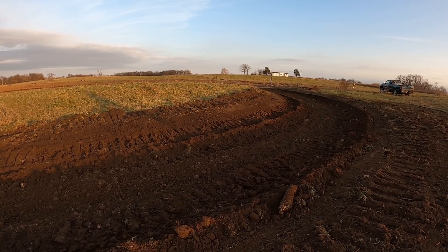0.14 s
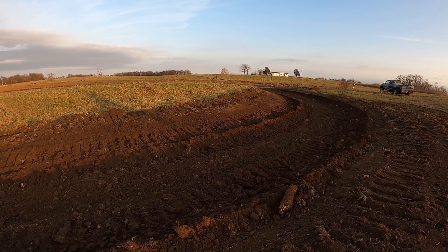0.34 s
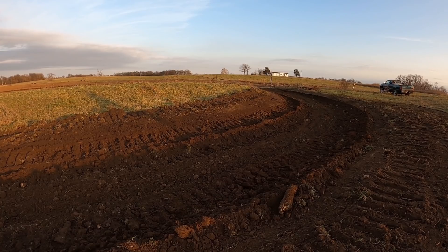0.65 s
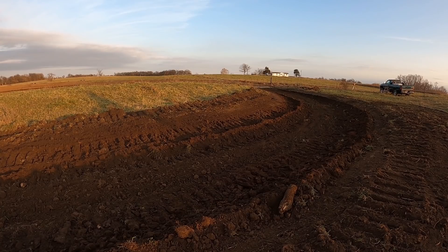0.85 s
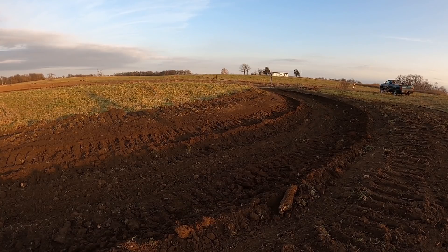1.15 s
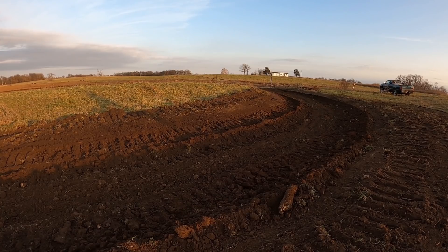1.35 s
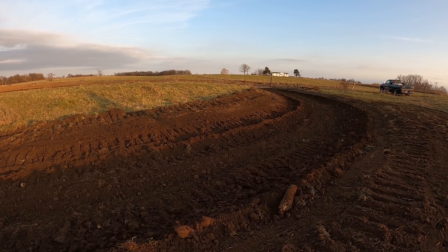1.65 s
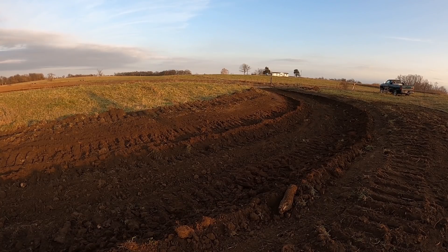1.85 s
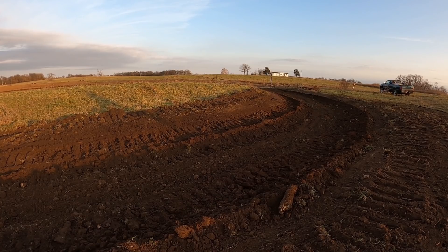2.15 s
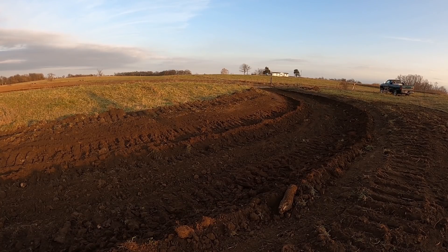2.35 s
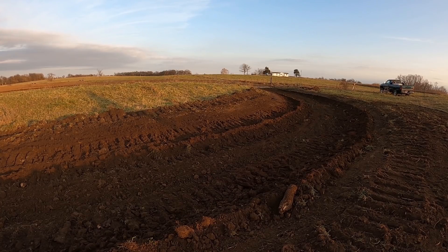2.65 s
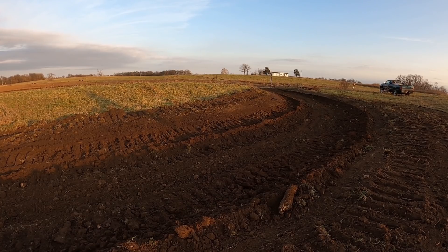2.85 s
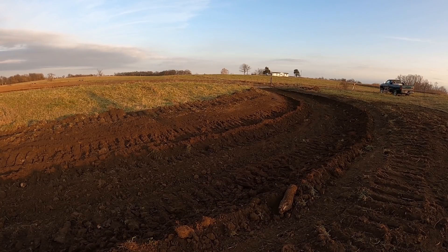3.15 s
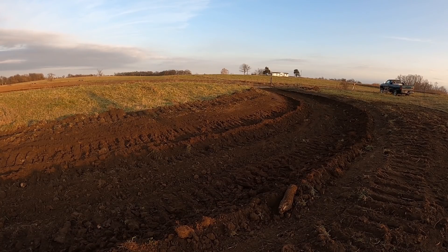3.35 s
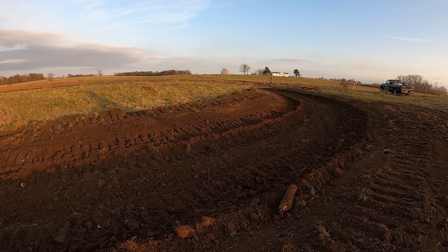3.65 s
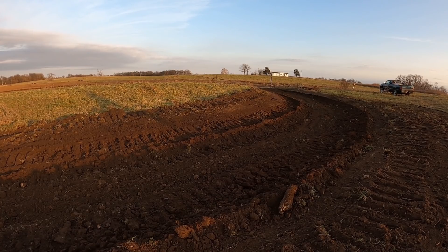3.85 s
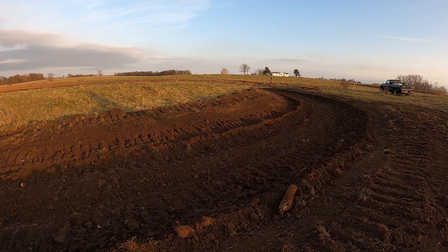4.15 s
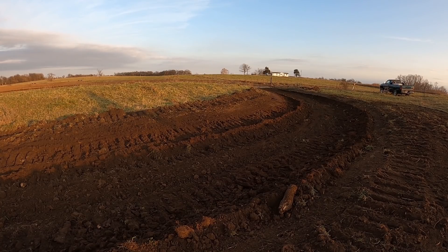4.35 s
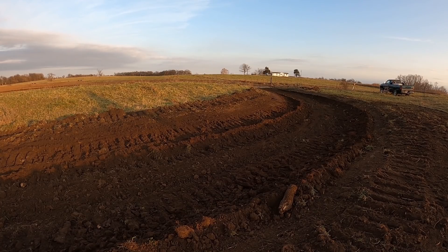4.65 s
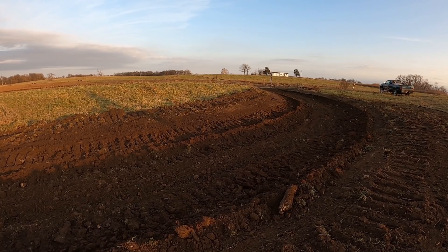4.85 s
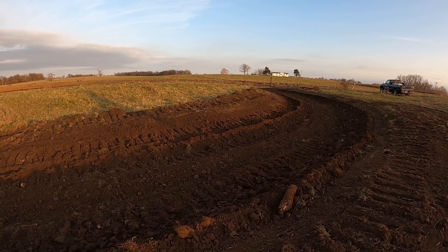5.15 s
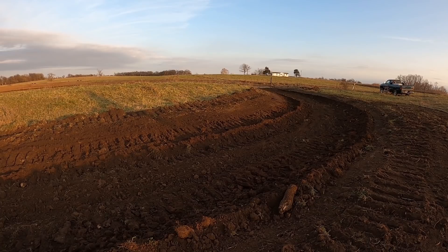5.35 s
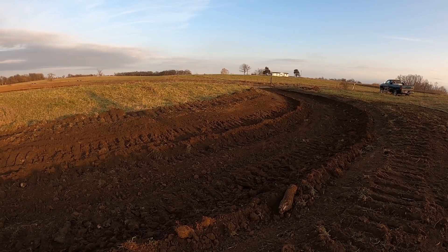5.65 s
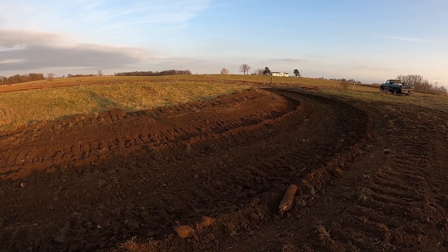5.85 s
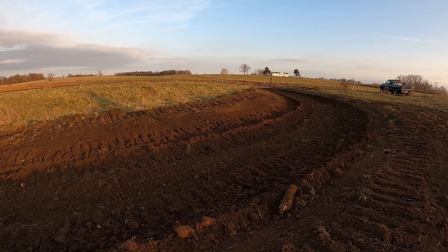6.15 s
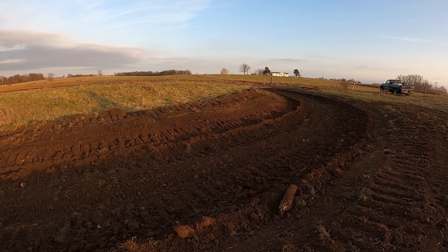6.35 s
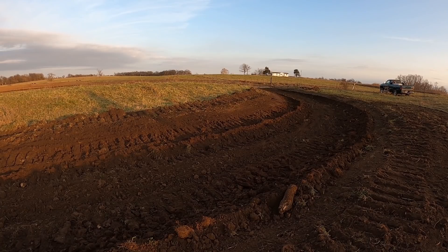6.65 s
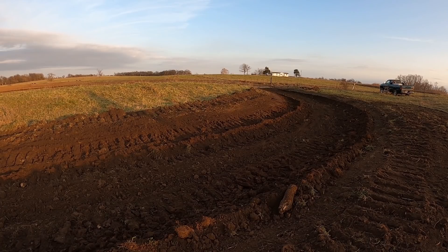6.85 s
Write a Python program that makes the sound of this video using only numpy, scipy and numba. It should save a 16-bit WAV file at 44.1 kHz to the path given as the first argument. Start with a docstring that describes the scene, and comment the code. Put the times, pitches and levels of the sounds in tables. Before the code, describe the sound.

A diesel crawler works in an open field, unseen, off to the left. From 0 to 2.2 seconds its engine holds a low, buzzing drone around 110 Hz, with frame rumble, fan roar, light hiss, thin intake whistle and a rough, patchy gear whine near 1 kHz. Track links clank in quick irregular clusters, with fine metallic ticks; tiny high squeaks come at the start and near 1 second. At about 2.3 the throttle drops: the note weakens and slides down by more than an octave until 3.3, whine fading, clanks continuing more sparsely. Around 3.4 the engine catches strongly and climbs back by 4.1, almost clank-free. Then clanks return, steadier and brighter, roar builds, and the whine rises slightly higher than before, with a brief squeak near 6.2. Work continues to the cut at 7 seconds. Treble is muffled; the right side is thinner and more diffuse.

```python
"""A diesel crawler works soil off to the left of a small camera in an open field.
Its engine sags when the throttle drops, then pulls back up: tones follow the cylinder firings,
and random pulses ring the exhaust pipe. Track links clank as rattles of blows into plate resonances.
Filtered noise makes the fan roar, hiss and intake whistle; sine waves make the gear whine and pin squeaks.
The right side hears the machine thinned by subtracting two microphone ports, plus diffuse sound."""
import sys
import numpy as np
from scipy import signal
from scipy.fft import rfft, irfft, next_fast_len
from scipy.io import wavfile
from scipy.ndimage import uniform_filter1d
from numba import njit

SR = 44100
rng = np.random.default_rng(int(sys.argv[2]) if len(sys.argv) > 2 else 0)


def unload_audio(sound):
    """Save the sound as a 16-bit wav file, at the path given as the first command line argument."""
    columns = np.transpose(np.atleast_2d(sound))
    # keep every value between -1 and 1, then stretch to whole-number steps
    steps = np.round(np.clip(columns, -1, 1) * 32767)
    wavfile.write(sys.argv[1], SR, steps.astype(np.int16))


N = 309141  # samples

# Engine at work, throttle cut, coast down, pull back up: time_s, firing_rate_hz, note_level_db
ENGINE = [(0, 111.1, -15), (1.02, 112.3, -18), (1.12, 109.5, -16), (1.35, 111.7, -16.5), (2.245, 109, -18),
          (2.285, 106.4, -27.5), (2.34, 100, -30), (2.5, 87.8, -30), (2.7, 76.2, -24.5), (2.9, 66.3, -30),
          (3.26, 45.7, -31), (3.32, 46.02, -27.5), (3.39, 58.66, -19.5), (3.45, 65.3, -15.5),
          (3.74, 82.44, -16), (4.09, 99.05, -15.5), (4.3, 98.63, -18), (4.45, 97.4, -18),
          (5.02, 105.2, -17.5), (6.2, 107.9, -17), (7.01, 109.1, -17.5)]
# Engine octave set by the pipe: octave_pitch_hz, level_against_note_db
OCTAVE = [(90, 9), (112, -2), (132, -14), (146, -15.5), (156, -24), (165, -2), (176, -14), (186, -22),
          (200, -24), (216, -20.5), (223, -13.5)]
# Tones from uneven cylinder banks: multiple_of_firing_rate, level_against_note_db (peak against rms)
HALF_ORDERS = [(.5, -29), (1.5, -15)]
# Exhaust pipe resonances: pitch_hz, width_hz (each of two passes), relative_level_db
PIPE = [(225.1, 13, 0), (242.2, 9.7, 2), (288, 40, -8.5)]
# Noise under load: time_s, relative_roar_level_db, relative_rumble_level_db
LOAD = [(0, -31.5, -30.5), (.95, -34, -28.5), (1.31, -35, -31), (1.62, -32.5, -27.5), (2.07, -34.5, -27.5),
        (2.7, -37.5, -28), (3.35, -41, -31.5), (3.42, -41, -27.5), (3.62, -41.5, -30), (3.85, -39.5, -29),
        (4.2, -35.5, -27.5), (5.11, -33, -25.5), (7.01, -30.5, -25.5)]
# Tone colour of the frame rumble: pitch_hz, relative_level_db (per Hz)
RUMBLE = [(20, -20.5), (40, -7.5), (65, -4), (100, -3), (135, 3.5), (155, 2.5), (180, -4.5), (250, -13),
          (320, -28.5), (420, -56.5)]
# Track links landing: start_s, low_body_db, upper_body_db, treble_db (relative levels)
CLANKS = [(.069, -24.5, -30.5, -28), (.104, -31, -31.5, -26), (.202, -21, -35, -39),
          (0.249, -24.5, -23.5, -31), (.293, -35.5, -41, -39), (.324, -24.5, -34, -45),
          (0.337, -20, -43, -47), (0.393, -29, -45, -43), (.437, -21, -40, -32), (0.501, -20.5, -49, -49),
          (0.522, -24.5, -41.5, -43), (.547, -21.5, -43, -35.5), (.635, -20.5, -29.5, -38),
          (.691, -26, -28.5, -35), (0.712, -20, -27.5, -26.5), (.738, -18, -30, -37),
          (0.847, -16, -35, -32), (.9, -19, -26, -41), (0.956, -20, -45, -34), (1.007, -21, -38, -34),
          (1.073, -26, -41, -48), (1.131, -28.5, -27.5, -31), (1.179, -20, -33, -36),
          (1.236, -27, -48, -56), (1.302, -23, -38, -39), (1.35, -32, -42, -41.5), (1.406, -25.5, -42, -44),
          (1.523, -25.5, -37, -50), (1.547, -22.5, -42, -40), (1.583, -23, -36, -44),
          (1.612, -18.5, -31, -31), (1.726, -22.5, -41, -54), (1.774, -20, -32.5, -30),
          (1.858, -23, -35, -47.5), (1.914, -27, -31, -41), (1.967, -22, -33.5, -50),
          (2.033, -26.5, -47, -56), (2.077, -23, -32, -46), (2.125, -25, -51, -52),
          (2.182, -21.5, -38, -43), (2.311, -20.5, -32, -33.5), (2.349, -19.5, -37, -29),
          (2.418, -21, -25, -36), (2.455, -21.5, -29, -34), (2.567, -29.5, -36, -49),
          (2.598, -19, -21.5, -31.5), (2.724, -15, -25, -29), (2.851, -26.5, -38, -45),
          (2.881, -27, -34.5, -52), (2.997, -26, -47, -55), (3.038, -21.5, -32, -48),
          (3.178, -25.5, -39, -41), (3.252, -26, -31.5, -50), (3.308, -28.5, -28, -36),
          (3.349, -26.5, -34.5, -42.5), (4.008, -31.5, -39, -52), (4.168, -20.5, -27.5, -38),
          (4.279, -22.5, -33, -47), (4.301, -23, -28, -40), (4.393, -24.5, -30, -45),
          (4.404, -17, -25.5, -46), (4.501, -27.5, -27.5, -47), (4.539, -22, -29, -45),
          (4.633, -17, -27, -34), (4.739, -26, -34, -49), (4.752, -21.5, -24, -23.5),
          (4.86, -16.5, -29.5, -22.5), (4.964, -16, -24.5, -37), (5.022, -22.5, -40, -58),
          (5.096, -17, -23, -25), (5.178, -20.5, -21, -22.5), (5.274, -27.5, -49, -52),
          (5.293, -21.5, -43, -50.5), (5.389, -23, -22.5, -25), (5.477, -27.5, -39, -51),
          (5.495, -22, -22, -28), (5.583, -21, -35, -41), (5.606, -14, -36, -36), (5.615, -29, -32, -33),
          (5.703, -19, -31, -34), (5.812, -24.5, -45, -48), (5.918, -18, -26, -34),
          (6.015, -21.5, -23, -24), (6.035, -22.5, -48, -23.5), (6.137, -17.5, -39.5, -33),
          (6.219, -19.5, -31.5, -34), (6.325, -21.5, -37, -38), (6.354, -29.5, -44, -39),
          (6.445, -20, -31, -38), (6.545, -23, -24.5, -42), (6.627, -24, -37, -46),
          (6.643, -21.5, -25.5, -43), (6.747, -18.5, -21.5, -35.5), (6.822, -21.5, -31, -33),
          (6.841, -26, -24, -30), (6.938, -16, -20, -31), (6.981, -31, -41, -46)]
# Track plate resonances in low, upper and treble groups: pitch_hz, width_hz, relative_level_db
PLATE_GROUPS = [
    [(188, 84, 0.5), (320, 110, -5), (588, 154, -6), (911, 41, 2.5), (1035, 93, 0.5), (1370, 283, -1.5)],
    [(1845, 175, 1), (2120, 170, 4), (2640, 1100, -4.5)],
    [(3505, 330, 11.5), (4290, 300, 8.5), (5560, 520, 5), (6700, 3700, -3.5)],
]
# Tone colour of the fan and valve roar: pitch_hz, relative_level_db (per Hz)
ROAR = [(30, -11), (250, 6.5), (330, -1), (420, -8), (490, -4.5), (580, -1.5), (750, -5), (980, 0),
        (1350, -5), (1600, -10.5), (2200, -16), (3000, -19.5), (4000, -28.5)]
# Tone colour of the hiss above it: pitch_hz, relative_level_db (per Hz)
HISS = [(1500, -22), (2300, -0.5), (3500, -1), (4500, -6), (5500, -10), (6500, -13), (8000, -13.5),
        (14000, -9.5)]
# Intake whistle bands: time_s, low_pitch_hz, low_level_db, high_pitch_hz, high_level_db
WHISTLE = [(0, 3600, -45, 4850, -43), (.27, 3590, -53, 4830, -46.5), (.35, 3600, -53.5, 4840, -42.5),
           (1.2, 3660, -81, 4690, -51.5), (2.3, 3740, -47, 4500, -67), (3.3, 3590, -50.5, 4600, -68),
           (3.4, 2835, -48, 4610, -55), (3.46, 2810, -48, 4710, -48.5), (3.62, 2910, -44.5, 4740, -52.5),
           (3.8, 2830, -49, 4800, -51), (3.95, 2990, -46, 4800, -51), (4.2, 2926, -47.5, 4780, -52),
           (4.6, 3632, -48.5, 4470, -54.5), (7.01, 3536, -44, 4820, -51)]
# Final-drive gear whine: time_s, pitch_hz, peak_level_db, octave_peak_level_db
WHINE = [(0, 940, -30, -50), (.3, 976.3, -34, -54), (.55, 1008, -32.5, -53), (.8, 992, -49, -52.5),
         (1.1, 975, -34.5, -56), (1.3, 978.2, -32, -56), (1.65, 1001, -33.5, -52), (1.9, 988, -43, -56),
         (2.15, 1012, -31, -50), (2.35, 1000, -53, -65), (4.15, 875, -46, -66), (4.5, 930, -38.5, -52),
         (4.75, 995, -35, -46), (5.05, 1041, -34, -41), (5.35, 1070, -35.5, -42.5),
         (5.75, 1055, -35.5, -40.5), (6.25, 1074, -33.5, -47), (6.7, 1092, -35.5, -44.5),
         (7.01, 1084, -42, -44)]
# Second gear pair: multiple_of_whine_pitch, level_against_whine_db
SECOND_GEAR = (1.275, -9.5)
# Dry track pins squeaking: centre_s, pitch_hz, length_s, peak_level_db
SQUEAKS = [(0.044, 6090, 0.02, -27.5), (1.026, 9900, 0.038, -22), (6.189, 9014, 0.033, -22)]
# Right side against left: pitch_hz, direct_level_db, direct_phase_rad, diffuse_level_db
RIGHT_SIDE = [(20, 0, 0, -20), (86, -.3, -.06, -20), (172, -1.1, -.1, -30), (260, -2.1, -.18, -25),
              (345, -3.7, -.26, -20), (430, -7, -.23, -18), (520, -10.7, -.14, -20), (700, -24, .2, -24),
              (820, -18, 2, -24), (1100, -25, 1, -23), (1550, -32, 1.5, -22), (1750, -18, 1.6, -19),
              (2250, -32, 1, -21), (2700, -12, 2.3, -17), (3200, -14, 1.6, -19), (3500, -32, 0, -24),
              (4200, -9, -1.8, -14), (5500, -14, -2.4, -16), (6800, -6, -1.5, -8), (8000, -7, -3.1, -5),
              (14000, -4, -3.1, 0)]
# Covered microphones: pitch_hz, gain_db
MIC = [(20, -0.5), (6300, 1), (7100, -8.5), (7900, -7), (8500, -15), (10500, -27), (12500, -29.5),
       (14000, -44.5)]

FULL_HZ, FULL_NOTE_DB, FULL_ROAR_DB = 110, -15.5, -32  # reference firing rate and levels at full work
BOOM_DB, BOOM_DB_PER_HZ, BOOM_LOW_DB = -25.5, 0.65, -35.5  # relative boom level, slope and floor
RAGGED_SHARE = 0.3  # extra spread of the note, in dB for each dB it drops
THROTTLE_SHARE = 0.092  # rumble lost, in dB for each dB the note drops
PIPE_DRIFT = 0.017  # share by which hot gas moves the pipe's resonances
LINK_S, BOUNCE_S = 0.015, 0.012  # time scales of a link's rattle and its bounces
STRIKE_DB, FIRST_DB = 20.5, -2  # full blow against the rattle; first contact against a full blow
TREBLE_STRIKE_DB = -4  # blunt blows give less to the top modes
PICK_DB = 2.0  # random spread of each blow's level across the modes
TICK_RATE_HZ, TICK_DB, TICK_STRIKE_DB = 105.0, 7.5, 15.0  # average rate; noise against roar; strike
HISS_DB, HISS_SHARE = -40, 0.77  # relative hiss at full roar; dB change for each dB of roar
WAVER, PATCHY_DB = 0.005, 3  # slow pitch spread (as a share) and level spread of the whine
TOP_HZ, EDGE_S = 14000, 0.004  # recorder's upper limit; fade at each end


def undb(db):
    """Turn decibels into gain."""
    return 10 ** (np.asarray(db) / 20)


def level(x, db):
    """Scale a sound to an average (rms) level in dB."""
    return x * undb(db) / np.sqrt(np.mean(x ** 2))


def curves(table):
    """Draw straight lines through a timed table, giving one value per sample for each column."""
    time_s, *columns = np.transpose(table)
    return [np.interp(np.arange(N) / SR, time_s, column) for column in columns]


def colour(x, hz, db, rad=None):
    """Change the gain, and optionally the phase, of each frequency."""
    size = next_fast_len(N + 4096)
    at = np.log(np.fft.rfftfreq(size, 1 / SR) + 1)  # points are joined on a log-frequency axis
    gain = undb(np.interp(at, np.log(hz), db))
    if rad is not None:
        gain = gain * np.exp(1j * np.interp(at, np.log(hz), rad))
    return irfft(rfft(x, size) * gain, size)[..., :N]


@njit
def resonator(x, hz, width):
    """A band-pass filter with a movable centre, where its gain is 1."""
    y, band, low = np.empty(len(x)), 0., 0.
    for i in range(len(x)):
        g, damping = np.tan(np.pi * hz[i] / SR), width / hz[i]
        v = (band + g * (x[i] - low)) / (1 + g * (g + damping))
        band, low, y[i] = 2 * v - band, low + 2 * g * v, damping * v
    return y


def ring(x, modes, drift=0):
    """Ring each row of x through resonances whose centres may drift by a share."""
    rows = []
    for row in x:
        total = 0
        for k, (hz, width, db) in enumerate(modes):
            centre = np.full(N, 1. * hz) * (1 + drift)
            total = total + (-1) ** k * undb(db) * resonator(row, centre, 1. * width)
        rows.append(total)
    return np.array(rows)


def walk(rate):
    """A smooth random wander with a spread near 1, changing about `rate` times a second."""
    hold = int(SR / rate)
    steps = np.repeat(rng.standard_normal(N // hold + 1), hold)
    return 0.827 * uniform_filter1d(uniform_filter1d(steps, hold), hold)[:N]


def noise():
    """Two unrelated noise rows: direct sound and diffuse sound for the right side."""
    return rng.standard_normal((2, N))


def exhaust_note(turn, note_db, octave_db):
    """Regular firings make a note and its octave; uneven cylinder banks add tones between."""
    ragged_db = 0.2 + RAGGED_SHARE * np.maximum(FULL_NOTE_DB - note_db, 0)
    note_gain = np.sqrt(2) * undb(note_db + ragged_db * walk(18))
    note = note_gain * np.cos(2 * np.pi * turn + 0.055 * walk(30))
    octave_gain = np.sqrt(2) * undb(octave_db + 2 * walk(7.0))
    octave = octave_gain * np.cos(4 * np.pi * turn + 0.5 * walk(3.3))
    halves = 0
    for multiple, db in HALF_ORDERS:
        phase = 2 * np.pi * multiple * turn + 0.8 * walk(6.8)
        halves = halves + undb(note_db + db + 2.1 * walk(5.4)) * np.cos(phase)
    return note + octave + halves


def pipe_boom(turn, boom_db):
    """Each firing sends a pulse of random size twice through the pipe's drifting resonances."""
    count = turn.astype(int)
    pulses = np.diff(count, prepend=0) * rng.standard_normal(N // 200)[count]
    drift = PIPE_DRIFT * walk(5)
    boom = ring(ring([pulses], PIPE, drift), PIPE, drift)[0]
    return level(boom, -2.46) * undb(boom_db)


def frame_rumble(rumble_db):
    """Low filtered noise with a wandering level makes the frame's rumble."""
    rumble = colour(rng.standard_normal(N), *np.transpose(RUMBLE))
    return level(rumble, 3.64) * undb(rumble_db + 1.4 * walk(11))


def track_hits(roar_db):
    """Links land in rattles and bounces, and loose parts tick: noise and strikes for each mode."""
    t = np.arange(int(0.08 * SR)) / SR
    rise = 1 - np.exp(-t / 0.00046)
    group = np.repeat(np.arange(len(PLATE_GROUPS)), [len(modes) for modes in PLATE_GROUPS])
    rattle, strike = np.zeros((len(group), N + len(t))), np.zeros((len(group), N))
    blunt = undb(TREBLE_STRIKE_DB * (group == len(PLATE_GROUPS) - 1))
    blow = rise * (0.35 * np.exp(-(t / LINK_S) ** 2) + 0.15 * np.exp(-t / 0.018))
    for start_s, *body_db in CLANKS:
        i = int(start_s * SR)
        gain = undb(np.array(body_db)[group] + PICK_DB * rng.standard_normal(len(group)))
        rattle[:, i:i + len(t)] += gain[:, None] * blow
        strike[:, i] += gain * undb(STRIKE_DB + FIRST_DB) * blunt  # first metal-on-metal contact
        bounces = rng.random((3, 2))
        for k, (late, size) in enumerate(bounces):
            # each bounce has its own random slot, later ones being weaker on average
            at = i + int((k + 0.5 + late) / len(bounces) * BOUNCE_S * SR)
            bounce_db = STRIKE_DB - 2.5 * k - 3.7 * size - 2.5
            strike[:, min(at, N - 1)] += gain * undb(bounce_db) * blunt
    tick = rise * np.exp(-t / 0.0053)
    for when, size, *tone in rng.random((int(TICK_RATE_HZ * N / SR), 2 + len(group))):
        i = int(when * N)
        tone_db = -9.1 * np.array(tone) - np.array([0, 5.0, 9.0])[group]
        gain = undb(roar_db[i] + TICK_DB - 15.6 * size + tone_db)
        rattle[:, i:i + len(t)] += gain[:, None] * tick
        strike[:, i] += gain * undb(TICK_STRIKE_DB)
    return rattle[:, :N], strike


def tracks(roar_db):
    """Rattling noise and sharp strikes ring the metal plate's resonances."""
    rattle, strike = track_hits(roar_db)
    grit, out, k = noise(), 0, 0
    for modes in PLATE_GROUPS:
        unit, body = np.std(ring(grit, modes)), 0
        for mode in modes:
            hits = grit * rattle[k] + strike[k] * np.array([[1], [-1]])  # opposite in the diffuse row
            body = body + (-1) ** k * ring(hits, [mode]) / unit
            k += 1
        # little sound above the group's top mode
        low_pass = signal.butter(2, 1.225 * modes[-1][0], fs=SR, output="sos")
        out = out + signal.sosfilt(low_pass, body)
    return out


def roar(turn, roar_db, hiss_db):
    """Fan and valve noise puffs slightly with each firing, with a hiss above it."""
    puff = 1 + 0.039 * np.cos(2 * np.pi * turn)
    shake = walk(17)
    low = level(colour(noise() * puff, *np.transpose(ROAR)), 5.09) * undb(roar_db + 1.4 * shake)
    high = level(colour(noise() * puff, *np.transpose(HISS)), 2.78) * undb(hiss_db + 2.8 * shake)
    return low + high


def whistle():
    """Intake air whistles: noise passes twice through narrow moving bands."""
    low_hz, low_db, high_hz, high_db = curves(WHISTLE)
    high_hz = high_hz * (1 + 0.014 * walk(16))
    rows = []
    for air in noise():
        low = resonator(resonator(air, low_hz, 110.), low_hz, 110.)
        under = resonator(resonator(air, 0.9 * low_hz, 90.), 0.9 * low_hz, 90.)
        high = resonator(resonator(air, high_hz, 330.), high_hz, 330.)
        low = level(low + 0.72 * under, 0) * undb(low_db)
        rows.append(low + level(high, 0) * undb(high_db + 2.8 * walk(25)))
    return np.array(rows)


def whine():
    """Meshing gear teeth make a rough tone and a patchy octave; a second pair sounds above the tone."""
    hz, db, octave_db = curves(WHINE)
    waver = WAVER * walk(10) + 3 * WAVER * walk(90)
    mesh = 2 * np.pi * np.cumsum(hz * (1 + waver)) / SR
    tone = undb(db + PATCHY_DB * walk(30)) * np.sin(mesh)
    octave = undb(octave_db + 2 * PATCHY_DB * walk(25)) * np.sin(2 * mesh)
    multiple, second_db = SECOND_GEAR
    second = undb(db + second_db + 2 * PATCHY_DB * walk(4)) * np.sin(multiple * mesh)
    return tone + octave + second


def squeaks():
    """Dry track pins rub, making short tones with wavering pitch and level."""
    t, out = np.arange(N) / SR, 0
    for centre_s, hz, length_s, db in SQUEAKS:
        swell = undb(db + 4.2 * walk(150)) * np.exp(-((t - centre_s) / length_s * 2) ** 2)
        out = out + swell * np.sin(2 * np.pi * hz * t + walk(110))
    return out


def scene():
    """Left hears the machine directly; right hears it thinned, plus diffuse roar, whistle and tracks."""
    hz, note_db = curves(ENGINE)
    roar_db, rumble_db = curves(LOAD)
    turn = np.cumsum(hz) / SR  # running count of firings
    octave_db = note_db + np.interp(2 * hz, *np.transpose(OCTAVE))
    boom_db = np.maximum(BOOM_DB + BOOM_DB_PER_HZ * (hz - FULL_HZ), BOOM_LOW_DB) + 0.65 * walk(8.6)
    rumble_db = rumble_db + THROTTLE_SHARE * (note_db - FULL_NOTE_DB)
    hiss_db = HISS_DB + HISS_SHARE * (roar_db - FULL_ROAR_DB)
    engine = exhaust_note(turn, note_db, octave_db) + pipe_boom(turn, boom_db) + frame_rumble(rumble_db)
    direct, diffuse = tracks(roar_db) + roar(turn, roar_db, hiss_db) + whistle()
    left = engine + direct + whine() + squeaks()
    at_hz, direct_db, rad, diffuse_db = np.transpose(RIGHT_SIDE)
    right = colour(left, at_hz, direct_db, rad) + colour(diffuse, at_hz, diffuse_db)
    return np.array([left, right])


def record(dry):
    """Covered microphones lose treble and the recorder cuts the top; both ends fade briefly."""
    top = signal.ellip(8, 0.2, 70, TOP_HZ, fs=SR, output="sos")
    nearest_end = np.minimum(np.arange(N), np.arange(N)[::-1])
    edge = np.minimum(nearest_end / (EDGE_S * SR), 1)
    faded = dry * np.sin(edge * np.pi / 2) ** 2
    return signal.sosfilt(top, colour(faded, *np.transpose(MIC)))


dry = scene()
out = record(dry)
unload_audio(out)
```